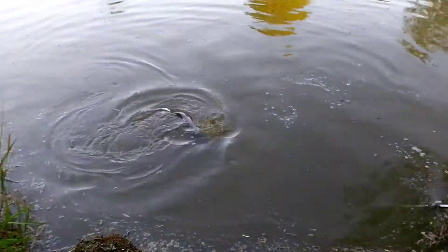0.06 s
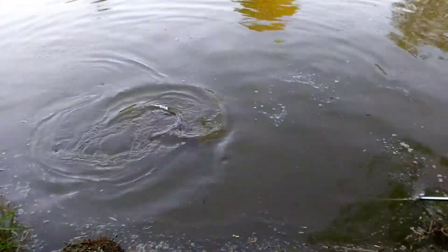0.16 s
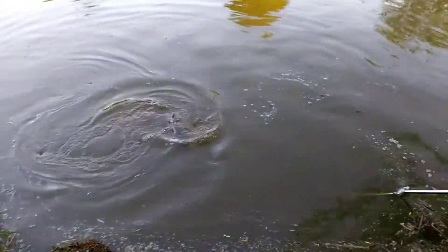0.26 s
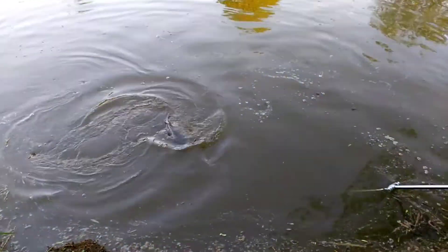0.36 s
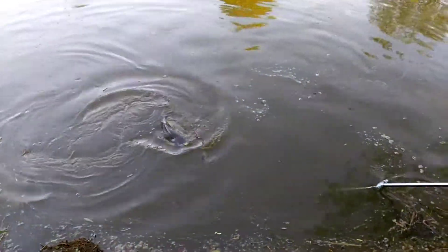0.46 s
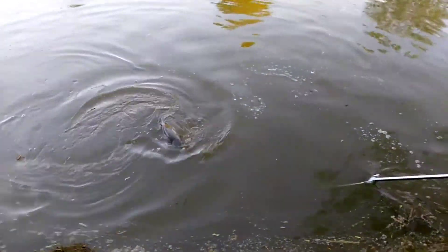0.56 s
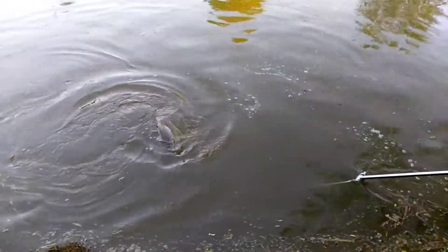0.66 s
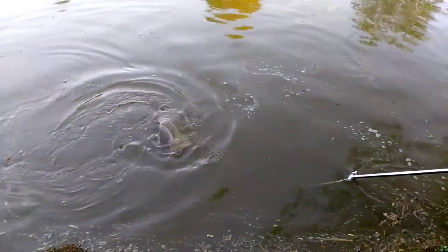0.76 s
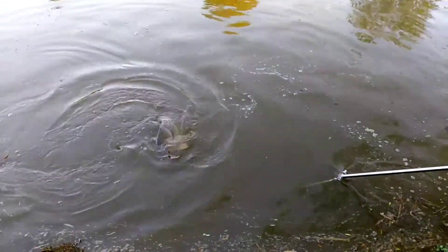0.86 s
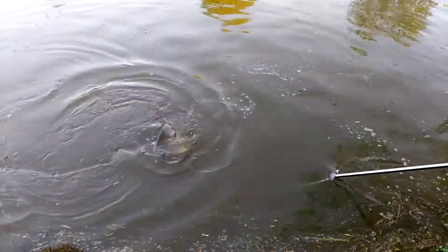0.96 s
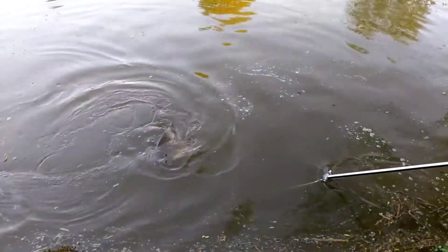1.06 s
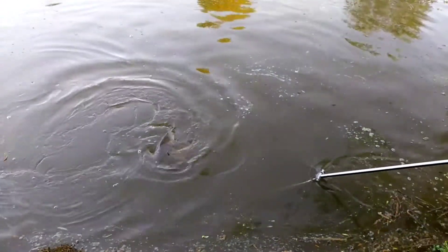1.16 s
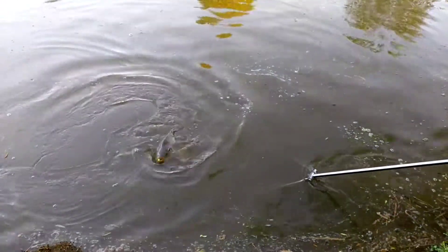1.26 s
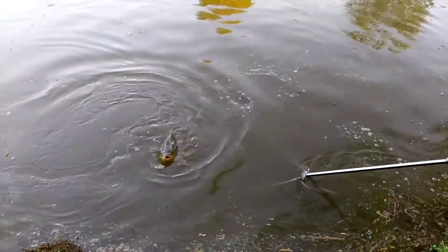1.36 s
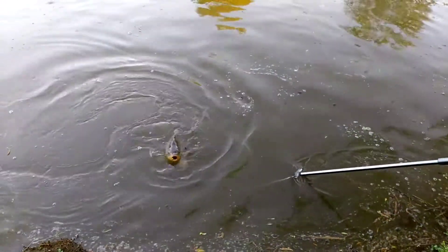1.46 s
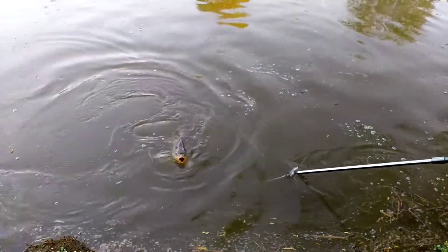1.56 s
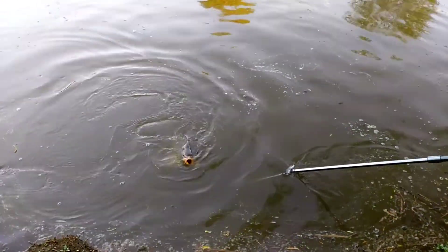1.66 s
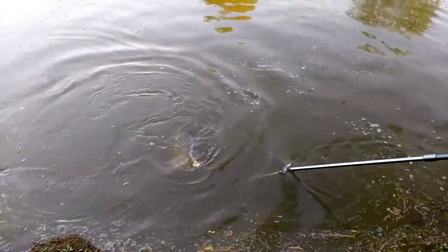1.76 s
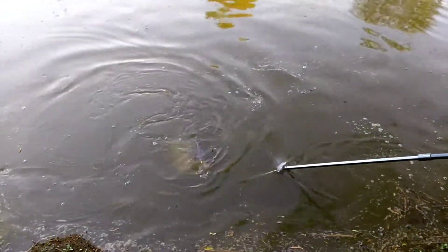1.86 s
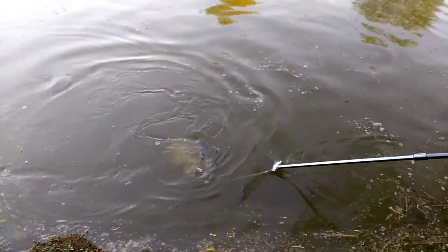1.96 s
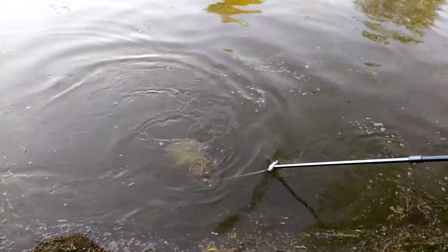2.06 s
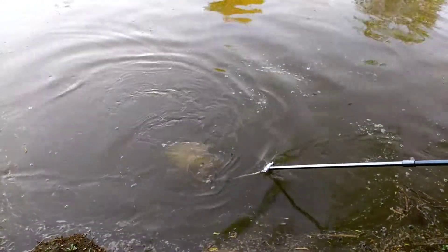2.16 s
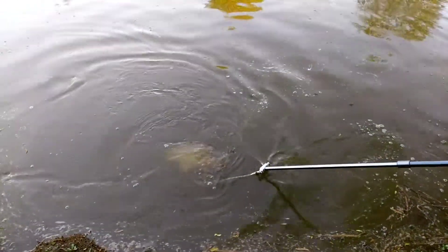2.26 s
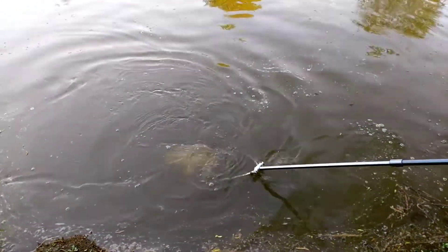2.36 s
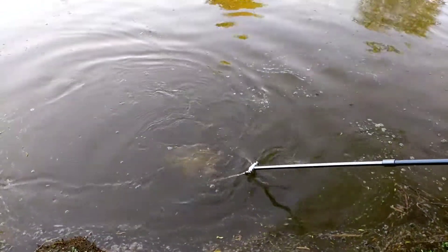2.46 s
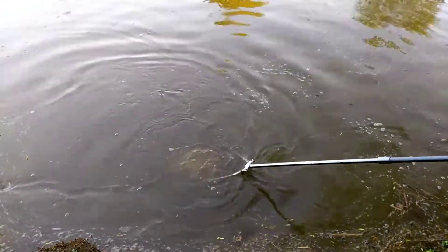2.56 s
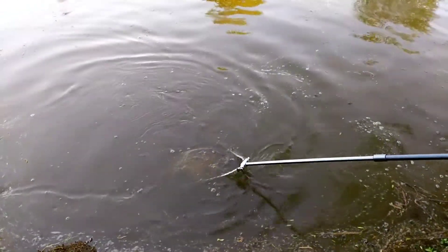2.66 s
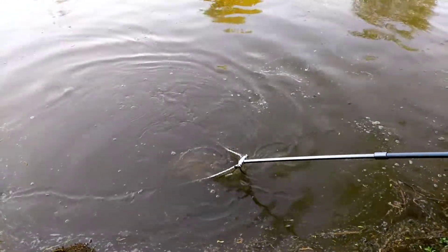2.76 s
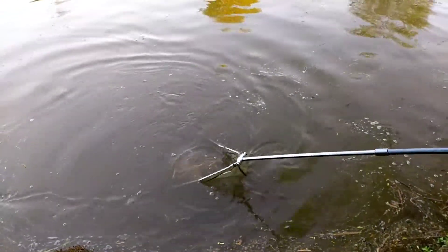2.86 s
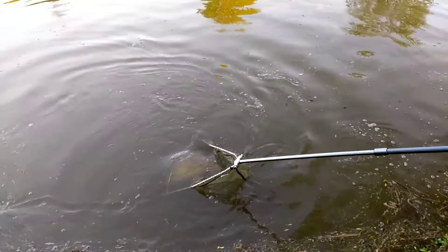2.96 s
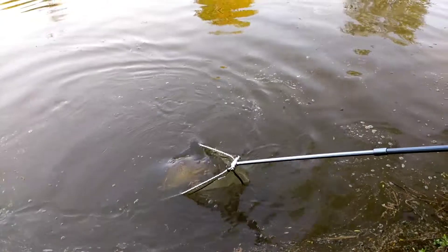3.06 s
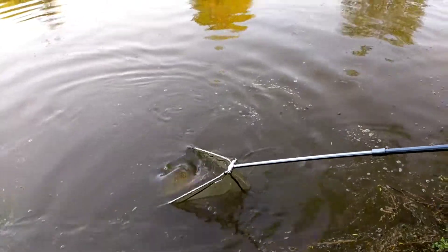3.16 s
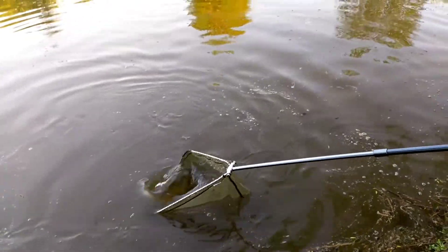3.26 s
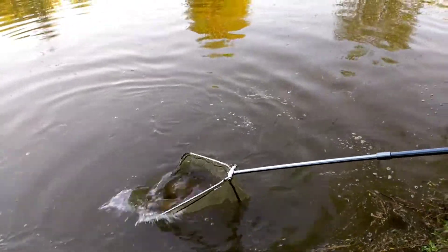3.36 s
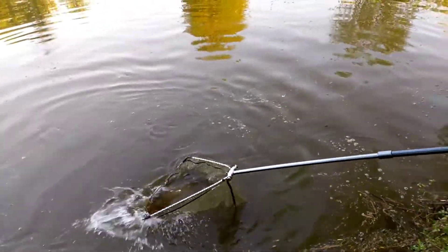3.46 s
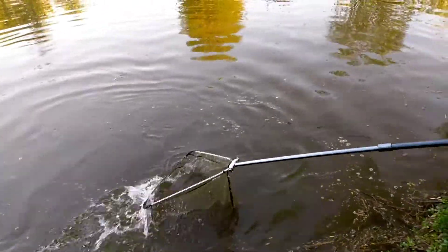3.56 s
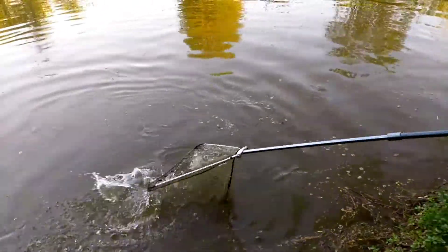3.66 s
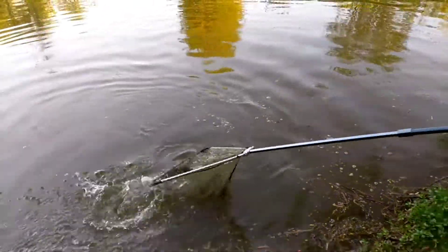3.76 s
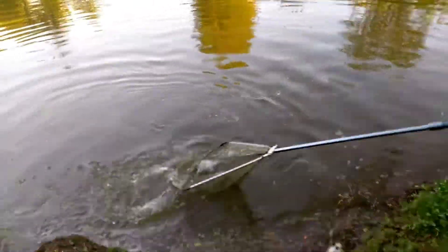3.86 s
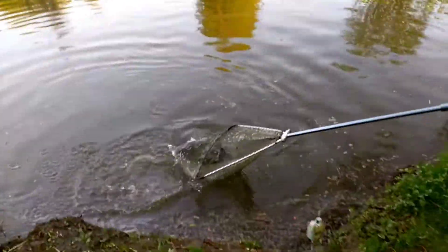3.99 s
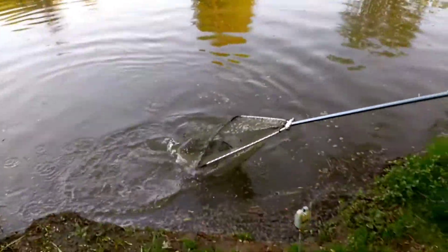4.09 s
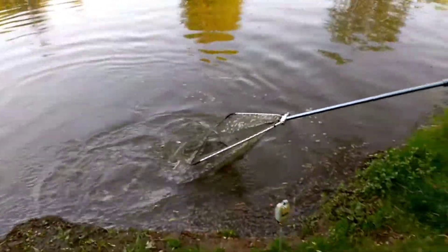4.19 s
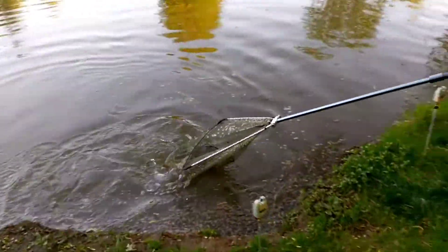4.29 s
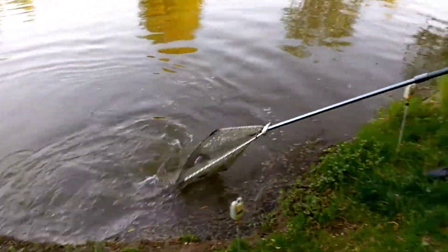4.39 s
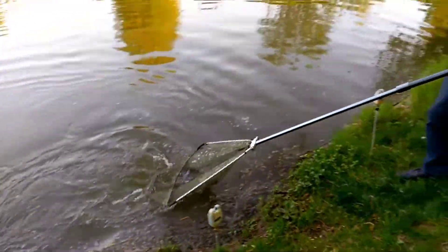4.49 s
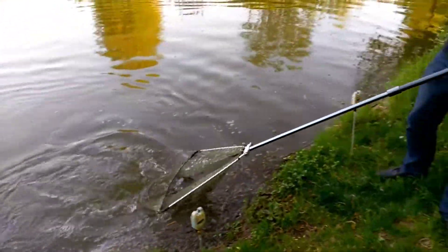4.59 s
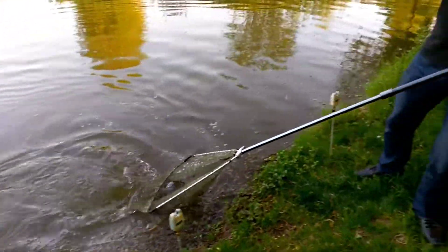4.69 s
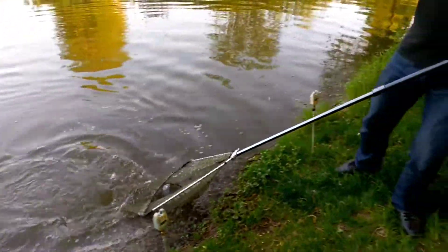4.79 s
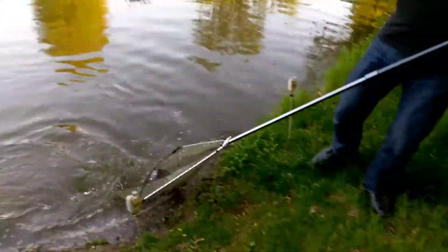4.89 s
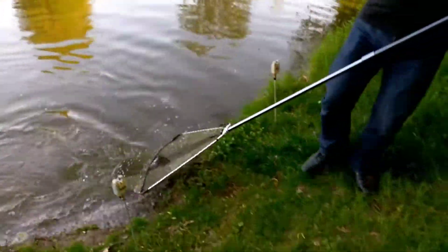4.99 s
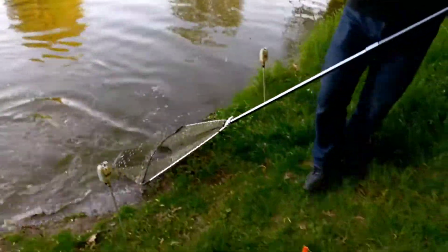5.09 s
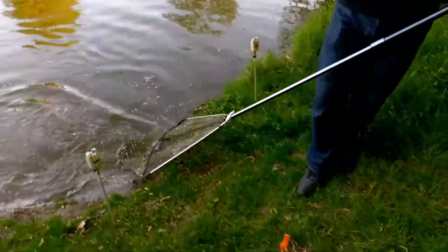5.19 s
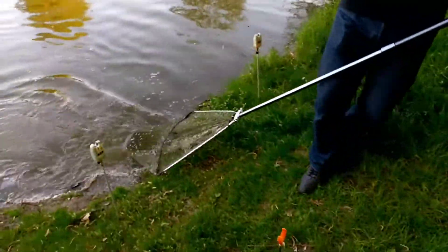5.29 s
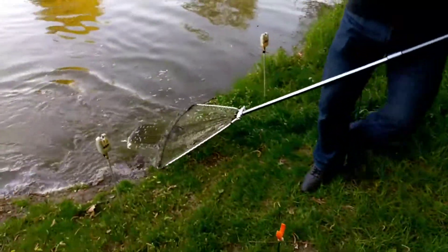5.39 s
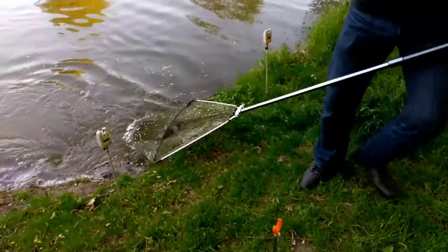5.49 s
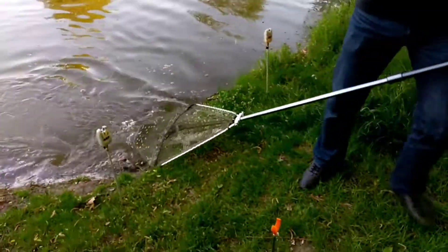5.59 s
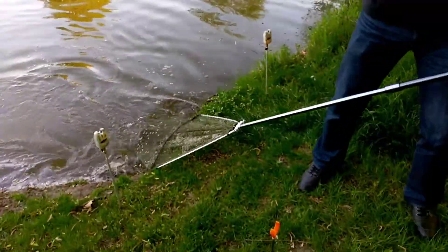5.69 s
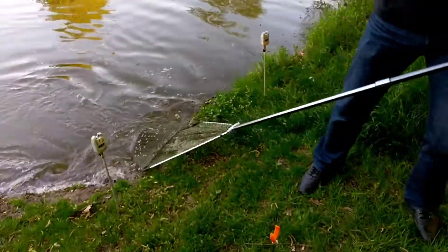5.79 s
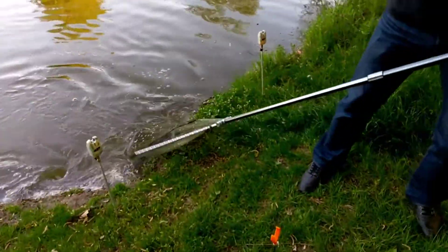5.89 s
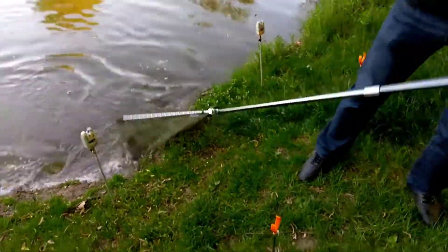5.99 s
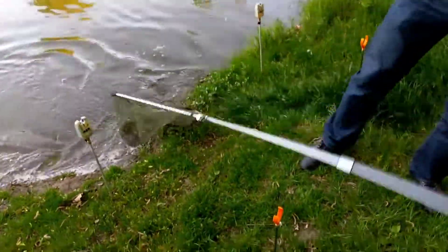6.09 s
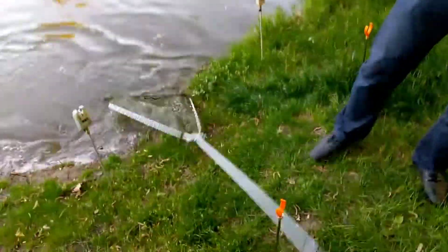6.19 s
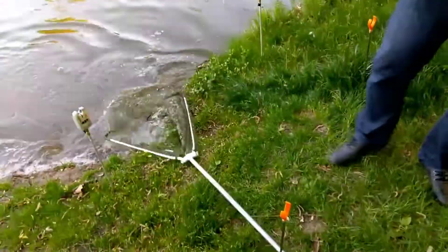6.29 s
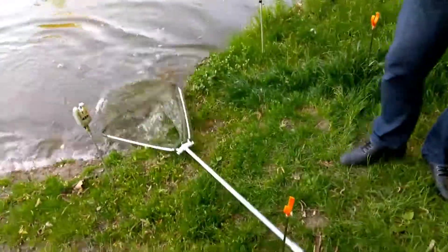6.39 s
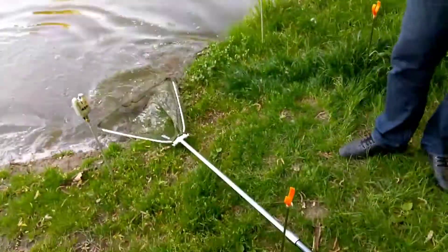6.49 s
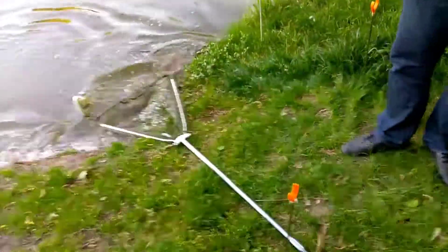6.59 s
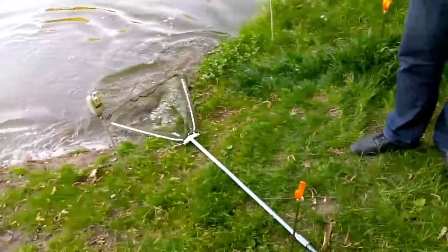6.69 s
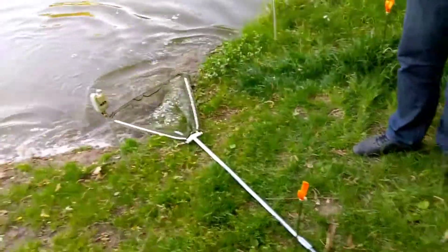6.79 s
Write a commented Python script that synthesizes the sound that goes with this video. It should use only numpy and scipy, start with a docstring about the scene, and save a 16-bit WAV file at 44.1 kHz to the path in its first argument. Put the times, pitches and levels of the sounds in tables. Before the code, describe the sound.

Faint birdsong by still water, a sudden burst of bubbly splashing, dripping mesh dragged ashore through air buffets, then a sharp metallic clatter on turf.

```python
"""At the edge of a pond a carp thrashes in a landing net and is dragged to the bank, near the microphone.
Water is noise and swarms of ringing bubbles; slaps and drips are short rings with a spray of noise.
Air buffets the moving microphone as low lumpy noise and dull bumps; mesh and grass are brushed noise.
The net's metal pole drops on the grass close by: noise blows excite the ringing modes of the tube.
Small birds, gliding and fluttering tones with echoes, twitter in the trees until the end."""
import sys
import numpy as np
from scipy import signal
from scipy.fft import rfft, irfft
from scipy.io import wavfile
from scipy.ndimage import uniform_filter1d

SR = 44100
rng = np.random.default_rng(int(sys.argv[2]) if len(sys.argv) > 2 else 0)


def log_audio(samples):
    """Write samples as a 16-bit WAV file to the path given in sys.argv[1]."""
    # one column per channel
    frames = np.atleast_2d(samples).T
    # limit to full scale, then quantise
    limited = np.clip(frames, -1, 1)
    pcm = np.round(limited * 32767).astype(np.int16)
    wavfile.write(sys.argv[1], SR, pcm)


N = 301644
TIME = np.arange(N) / SR
FREQS = np.fft.rfftfreq(N, 1 / SR)


def amp(db):
    """Decibels to gain."""
    return 10 ** (np.asarray(db) / 20)


def unit(x):
    """Scales to rms 1."""
    return x / np.sqrt(np.mean(x ** 2) + 1e-20)


def read(points, hz, axis=1):
    """A column of a table, interpolated on a log-frequency axis."""
    table = np.transpose(points)
    return np.interp(np.log(hz + 1), np.log(table[0] + 1), table[axis])


def level(rows):
    """A dB curve as gain, silent outside its span."""
    times, db = np.transpose(rows)
    inside = (TIME >= times[0]) & (TIME <= times[-1])
    return amp(np.interp(TIME, times, db)) * inside


def colour(x, spectrum):
    """Filters by a spectrum, keeping the power of white noise."""
    return irfft(rfft(x) * unit(amp(read(spectrum, FREQS))), N)


def add(mix, s, sound):
    """Adds a sound at time s."""
    part = mix[..., max(round(s * SR), 0):][..., :sound.shape[-1]]
    part += sound[..., :part.shape[-1]]


def drift(hz, count=N):
    """Slow chance of rms 1, moving up to about hz times a second."""
    lowpass = 1 / (1 + (np.fft.rfftfreq(count, 1 / SR) / hz) ** 4)
    return unit(irfft(rfft(rng.standard_normal(count)) * lowpass, count))


def burst(length, count=4096):
    """Time and envelope of a blow: a quick swell to 1 at half its length, then a slower fall."""
    t = np.arange(count) / SR
    rise = np.sqrt(2 * t / length)
    return t, rise * np.exp(.5 - t / length)


def swell(s, hold, attack, fall_db_per_s):
    """Attack, hold and release, as gain over the whole scene."""
    age = TIME - s
    return np.clip(age / attack, 0, 1) * amp(-fall_db_per_s * np.maximum(age - attack - hold, 0))


def swells(rows, attack, fall_db_per_s):
    """The joint level of overlapping swells, given as (s, hold s, dB); their powers add."""
    power = sum((amp(db) * swell(s, hold, attack, fall_db_per_s)) ** 2 for s, hold, db in rows)
    return np.sqrt(power)


def ports(x, pair):
    """Two unrelated channels become the microphone pair, whose bass is in roughly opposite phase."""
    same = np.clip(read(pair, FREQS), 0, 1)
    lead = read(pair, FREQS, axis=2)
    tilt = amp(read(pair, FREQS, axis=3) / 2)
    a, b = rfft(x)
    left = (same * a + np.sqrt(1 - same ** 2) * b) * np.exp(1j * lead) * tilt
    return irfft([left, a / tilt], N)


def echoes(x, t60, wet_db):
    """Sparse scattered returns from bank and trees, different on each side."""
    t = TIME[:SR]
    hits = rng.random((2, SR)) < .04
    taps = rng.standard_normal((2, SR)) * hits * amp(-60 * t / t60) * (t > .004)
    taps /= np.linalg.norm(taps, axis=1, keepdims=True)
    return x + amp(wet_db) * signal.oaconvolve(x, taps, axes=1)[:, :N]


def air():
    """Open air far off: a rumble and the soft hiss of trees, as coloured noise that wavers in level."""
    # colour of the open air: freq_hz, density_db (relative, per Hz)
    air_colour = [(20, -28), (38, -17), (65, 6.5), (90, 2), (144, -6.5), (342, -17), (572, -18), (834, -13),
                  (1250, -13), (1930, -19.5), (3490, -19), (5370, -27), (8270, -30.5), (15800, -35)]
    # loudness of the air: time_s, level_db
    air_level = [(0, -55), (1.1, -55.5), (2, -55.5), (3.2, -55.5), (5, -53.5), (6.84, -57)]
    # microphone pair for far sound: freq_hz, likeness (0-1), left_lead_rad, left_minus_right_db
    far_pair = [(73, 0.98, 3.76, -5), (232, 0.88, 3.59, -4.5), (586, 0.53, 3.93, -4.5), (934, 1, 5.16, -2),
                (1290, 1, 5.25, -2), (1890, 0, 7.2, -0.5), (3020, 0.45, 9.8, -4), (4600, 0.13, 9, -3.5),
                (6460, 0, 5.8, -3.5), (9000, 0.03, 6.5, -3.5), (16000, .05, 13.4, -4.5)]
    hiss = colour(rng.standard_normal((2, N)), air_colour) * amp(0.78 * drift(6.9))
    return ports(hiss * amp(np.interp(TIME, *np.transpose(air_level))), far_pair)


def note(length, start_hz, middle_hz, end_hz, buzz):
    """A gliding whistle; in buzzy notes a fast flutter splits it into a comb."""
    note_spread = .008  # chance pitch offset of each note, as a share
    flutter_hz, shimmer_db = 560, 1.6
    waver = .015  # pitch share at a hoarseness of 1
    u = np.linspace(0, 1, int(length * SR))
    arch = np.polyval(np.polyfit([0, .5, 1], [start_hz, middle_hz, end_hz], 2), u)
    hoarse = (0.42 + min(buzz, .6)) * max(middle_hz / 5000, 1) ** 3  # the highest notes break up
    wobble = waver * hoarse * drift(236, count=16384)[:len(u)]
    hz = arch * (1 + note_spread * rng.standard_normal() + wobble)
    flutter = buzz * np.sin(2 * np.pi * np.cumsum(flutter_hz * arch / middle_hz) / SR)
    shimmer = unit(amp(shimmer_db * drift(90, count=16384)[:len(u)]))
    tone = np.sin(2 * np.pi * np.cumsum(hz) / SR + flutter)
    return shimmer * tone * signal.windows.tukey(len(u), .4)


def trill(s, length, hz, swing_hz, per_s, db):
    """A whistle that swings quickly up and down, loudest at the foot of each swing."""
    t = np.arange(int(length * SR)) / SR
    swing = np.cos(2 * np.pi * per_s * t)
    whistle = np.sin(2 * np.pi * np.cumsum(hz + swing_hz * swing) / SR)
    return s, amp(db) * whistle * (1 - 0.76 * swing) * signal.windows.tukey(len(t), .3)


def birds():
    """Phrases of evenly repeated syllables, plain whistles and one trill, echoing among the trees."""
    # the syllables by name: length_s, start_hz, middle_hz, end_hz, buzz_rad
    syllables = {"arch": (0.0336, 4550, 5850, 5150, 0.23), "under": (0.034, 4600, 4250, 3860, .7),
                 "chip": (.042, 4500, 5480, 3300, .8), "slur": (.052, 4300, 2700, 2270, 0.6),
                 "lift": (.078, 2200, 3080, 3600, .6), "rasp": (0.0273, 2900, 3200, 3400, 1.1),
                 "zip": (.047, 4300, 4640, 4740, 1.1), "sweep": (0.047, 4150, 5070, 5800, 1.14),
                 "dip": (.032, 3500, 3020, 2640, 1.0), "fall": (.042, 3250, 3000, 2500, .3),
                 "thin": (.105, 7350, 6680, 6420, .35), "sizzle": (.19, 7600, 6900, 6690, .8),
                 "purr": (0.113, 3600, 3700, 3700, 0.35), "flick": (0.019, 6100, 4800, 4200, 0.46)}
    # pace of each repeated syllable by name: period_s
    repeat_s = {"arch": .151, "under": .151, "chip": .188, "slur": .08, "rasp": .055, "zip": .103, "sweep":
                .133, "dip": .106, "thin": .098, "purr": .11, "flick": .32}
    # phrases: start_s, syllable, count, level_db (relative)
    phrases = [(0, "arch", 4, -61.5), (0, "under", 4, -57), (0.089, "slur", 1, -56.5),
               (.235, "rasp", 1, -56), (0.545, "dip", 1, -57), (.622, "slur", 1, -56.5),
               (0.673, "lift", 1, -57), (.747, "arch", 1, -62), (.783, "slur", 2, -59),
               (1.303, "chip", 2, -54), (1.356, "thin", 1, -62), (1.419, "rasp", 1, -59),
               (1.495, "thin", 1, -58.5), (1.657, "zip", 1, -55), (1.705, "rasp", 4, -59),
               (1.72, "sizzle", 1, -59.5), (1.992, "zip", 1, -51.5), (2.089, "zip", 2, -54.5),
               (2.308, "zip", 1, -51), (2.356, "thin", 2, -60.5), (2.404, "sweep", 4, -53.5),
               (2.606, "purr", 2, -53.5), (2.853, "dip", 5, -59), (2.957, "thin", 2, -61),
               (4.122, "fall", 1, -52), (4.18, "fall", 1, -52.5), (4.298, "fall", 1, -53),
               (6.412, "flick", 2, -58.5)]
    # plain whistles of other birds: start_s, length_s, start_hz, end_hz, level_db (relative)
    whistles = [(0.16, .07, 3220, 2850, -60), (0.213, .15, 1900, 2000, -66),
                (0.357, 0.088, 3460, 4410, -61), (0.404, 0.097, 3100, 2600, -62),
                (0.499, 0.11, 2290, 2400, -64.5), (1.163, 0.015, 2200, 2550, -57.5),
                (1.516, 0.21, 1798, 1760, -62.5), (1.933, 0.083, 2890, 4100, -59.5),
                (1.973, 0.26, 4500, 4620, -61), (1.997, .1, 2350, 2410, -59),
                (2.057, .11, 3100, 2520, -62.5), (2.369, 0.14, 2400, 2090, -64.5),
                (2.379, .1, 1340, 1600, -65), (2.747, .24, 2180, 2605, -58.5), (2.92, .1, 1453, 1525, -63),
                (3.095, 0.16, 2060, 2025, -67), (3.217, 0.058, 3690, 3973, -54),
                (3.299, 0.062, 3860, 3764, -51.5), (4.707, 0.091, 2226, 2420, -59),
                (6.747, 0.061, 4070, 4130, -62)]
    # the trill: start_s, length_s, pitch_hz, swing_hz, swings_per_s
    trill_row = (1.34, .16, 2420, 190, 43)
    bend, whistle_buzz = .72, .12  # share of the glide made by half time; radians
    out = np.zeros(N)
    for s, syllable, count, db in phrases:
        for k in range(round(count)):
            sung = note(*syllables[syllable])
            add(out, s + k * repeat_s.get(syllable, 0), amp(db) * sung)
    for s, length, start_hz, end_hz, db in whistles:
        middle_hz = start_hz + bend * (end_hz - start_hz)
        add(out, s, amp(db) * note(length, start_hz, middle_hz, end_hz, whistle_buzz))
    add(out, *trill(*trill_row, db=-61.5))
    sides = np.array([out * amp(-4.5), out * amp(3)])  # stronger on the right
    return echoes(sides, t60=0.49, wet_db=-2)


def rustle():
    """A dull, soft rub near the microphone: low noise that follows a level curve."""
    # loudness of the rub: time_s, level_db (relative)
    rub_level = [(0.55, -90), (0.59, -48), (0.63, -78), (0.8, -60), (0.95, -54), (1.15, -58), (1.6, -69.5)]
    # colour of the rub: freq_hz, density_db (relative, per Hz)
    rub_colour = [(60, -18), (150, 0), (360, -0.5), (600, -14), (1500, -45)]
    return colour(rng.standard_normal((2, N)), rub_colour) * level(rub_level)


def push(hz, half_length):
    """A dull swing of air pressure, centred four half lengths after its start."""
    t = np.arange(-4 * half_length, 4 * half_length, 1 / SR)
    return np.exp(-.5 * (t / half_length) ** 2) * np.cos(2 * np.pi * hz * t)


def buffeting():
    """Gusts on the microphone are lumpy low eddies with single dull bumps, mostly on the right port."""
    # gusts: start_s, hold_s, level_db (relative)
    gusts = [(3.39, 0.0092, -54.5), (3.81, .005, -50), (3.915, 0.038, -44), (4.09, .01, -50.5),
             (4.235, 0.016, -47.5), (4.32, 0.057, -41.5), (4.455, 0.015, -51.5), (5.165, 0.13, -48),
             (5.38, 0.22, -52), (5.59, 0.23, -40), (5.89, 0.14, -39), (6.07, .04, -47), (6.38, 0.38, -61.5)]
    # colour of the gusts: freq_hz, density_db (relative, per Hz)
    gust_colour = [(20, -28), (45, -8), (70, 7.5), (110, 6), (170, -2.5), (250, -12.5), (350, -22),
                   (600, -34), (1200, -69)]
    # single dull bumps: centre_s, peak_db (right port), pitch_hz
    bumps = [(0.591, -43.5, 121), (3.974, -28, 104), (4.358, -26, 90), (4.397, -33, 90), (5.183, -35, 150),
             (5.235, -23, 148), (5.2483, -17, 216), (5.3, -31, 125), (5.507, -30, 156), (5.551, -29.5, 158),
             (5.622, -20.5, 133), (5.657, -22.5, 113), (5.743, -24, 113), (5.829, -23, 113),
             (5.926, -23.5, 202), (6.053, -17.5, 195), (6.522, -38, 114)]
    # half length of a bump at a middling pitch; it shrinks with the square of the pitch
    bump_s, bump_hz = 0.0046, 112.6
    lumps = unit(amp(3.5 * np.tanh(drift(30))))
    strength = swells(gusts, attack=0.02, fall_db_per_s=233) * amp(6.5)
    eddies = colour(rng.standard_normal((2, N)), gust_colour) * lumps * strength
    for s, db, hz in bumps:
        swing = amp(db) * push(hz, bump_s * (bump_hz / hz) ** 2)
        add(eddies[0], s - len(swing) / SR / 2, swing)
    left = amp(-15) * eddies[1] - amp(-23.5) * eddies[0]
    return np.array([left, eddies[0]])


def drips():
    """Random drops off the mesh, weaker as it drains; rows like those of the slaps."""
    first_s, last_s, per_s = 3.95, 5.8, 16
    low_hz, high_hz = 746, 5600
    start_db, fade_db_per_s, spread_db = -42.5, 3, 1  # relative, as for the slaps
    times = np.arange(first_s, last_s, 1 / per_s)
    late, size, pitch, share = rng.random((len(times), 4)).T
    db = start_db - fade_db_per_s * (times - first_s) + spread_db * (2 * size - 1)
    hz = low_hz * (high_hz / low_hz) ** pitch
    return list(zip(times + late / per_s, db, hz, 0.79 * share))


def slaps():
    """Each slap or drop rings a small cavity, as narrow-band noise, and throws a wide spatter."""
    # single slaps, plops and small ticks, loud and faint:
    # start_s, level_db (relative), pitch_hz, spatter_share (0-1)
    slap_rows = [(0.6108, -34, 3700, .9), (2.765, -32, 3200, .7), (3.364, -29, 1500, .3),
                 (3.4935, -21, 3800, .6), (6.1445, -28, 1340, .85), (1.349, -45, 6000, .9),
                 (3.329, -40, 5800, .4), (3.416, -29, 3700, .4), (3.473, -30, 1200, .2),
                 (3.495, -27, 1300, .3), (3.509, -29, 5200, .3), (3.548, -30, 1400, .2),
                 (3.569, -28, 3500, .2), (3.606, -33, 3600, .3), (3.688, -30, 800, .3),
                 (3.725, -33, 3000, .6), (3.838, -32, 3700, .4), (3.878, -30, 3600, .6),
                 (3.924, -31, 3400, .7), (4.053, -39, 870, .3), (4.161, -35, 800, .2),
                 (4.371, -35, 700, .45), (4.6025, -35, 3600, .5), (5.118, -37, 810, .25),
                 (5.209, -39, 4500, .7), (5.220, -40, 1300, .1), (5.328, -43, 850, .1),
                 (5.340, -40, 1200, .2), (5.380, -41, 1150, .45)]
    # colour of the spatter: freq_hz, density_db (relative, per Hz)
    spatter_colour = [(300, 7), (1300, 3), (2200, 3.5), (3800, -8), (6000, -2.5), (12000, -5.5),
                      (16000, -12)]
    smack_s, plop_s = 0.0002, 0.0048  # a flat smack is short, a round plop rings longer
    cavity, spatter = np.zeros((2, 2, N))
    for s, db, hz, share in slap_rows + drips():
        share = np.clip(share, 0, 1)
        t, shape = burst(plop_s + share * (smack_s - plop_s))
        band = 1 / (1 + ((np.fft.rfftfreq(len(t), 1 / SR) / hz - 1) / 0.11) ** 2)
        ring = irfft(rfft(rng.standard_normal((2, len(t)))) * band) * shape
        ring *= np.linalg.norm(shape) / np.linalg.norm(ring, axis=1, keepdims=True)
        add(cavity, s, amp(db) * np.sqrt(1 - share ** 2) * ring)
        add(spatter, s, amp(db) * share * shape * rng.standard_normal((2, len(t))))
    return amp(-7) * (cavity + colour(spatter, spatter_colour))


def bubbles(per_s, spread_db, cycles, low_hz, high_hz, count=28):
    """Bubbles of many sizes; each rings a few cycles and rises in pitch as it nears the surface."""
    out = np.zeros((2, N))
    density = per_s * np.ones(N)
    for hz in np.geomspace(low_hz, high_hz, count):
        age = np.arange(int(5 * cycles * SR / hz)) / SR * hz / cycles
        ring = hz * np.exp(-age) * np.sin(2 * np.pi * cycles * age * (1 + 0.032 * age))
        born = np.flatnonzero(rng.random(N) < density / count / SR)
        size_db = spread_db * np.minimum(rng.exponential(1, len(born)), 3.5)
        size = amp(size_db) / np.sqrt(density[born])  # denser swarms are no louder in themselves
        clicks = np.zeros((2, N))
        clicks[:, born] = size * rng.choice([-1, 1], (2, len(born)))
        out += signal.oaconvolve(clicks, ring[None], axes=1)[:, :N]
    return unit(out)


def patchy(x, depth_db, size=256):
    """Sheets and clots of water: neighbouring pitches swell and fade together for some milliseconds."""
    z = signal.stft(x, nperseg=size)[2]
    field = rng.standard_normal(z.shape[1:])
    field = uniform_filter1d(field, size=5, axis=0)  # over pitch
    field = uniform_filter1d(field, size=4, axis=1)  # over time
    return unit(signal.istft(z * amp(depth_db * unit(field)), nperseg=size)[1][:, :N])


def stirred(beats):
    """How hard the water moves: beats that swell, hold and collapse, and a wash that settles slowly."""
    attack_s = .028
    wash = amp(-12) * swells(beats, attack_s, fall_db_per_s=12.5)
    return np.hypot(swells(beats, attack_s, fall_db_per_s=110), wash)


def water():
    """The harder the fish churns, the denser the bubbles; spray fizzes above and air pockets gulp below."""
    # the fish beats the water, later wallows in the shallows:
    # start_s, hold_s, churn_db (relative), spray_db (relative)
    thrashes = [(3.27, .04, -62, -74), (3.32, .04, -54, -64), (3.384, .075, -45, -59),
                (3.535, .03, -44, -58), (3.609, .04, -48, -64.5), (3.695, .03, -48.5, -57),
                (3.825, .05, -47.5, -54.5), (3.94, 0.027, -54, -68), (5.2, .15, -64, -81),
                (5.47, .3, -61, -70.5), (5.85, .25, -63, -78)]
    # large air pockets under the fish: time_s, level_db (relative)
    pocket_level = [(3.35, -85), (3.47, -53), (3.62, -54), (3.85, -56), (4.0, -70), (4.5, -67)]
    # colours of churn, spray and pockets: freq_hz, density_db (relative, per Hz)
    churn_colour = [(400, -16.5), (750, -3.5), (1300, 0.5), (1650, -0.5), (2200, -9), (3000, 1.5),
                    (3800, -4.5), (4600, -10.5), (5700, -6), (7500, -30), (15000, -47)]
    spray_colour = [(3500, 5.5), (6000, -3.5), (7500, 1), (9500, -3.5), (11700, -3.5), (13500, -6),
                    (16000, -14)]
    pocket_colour = [(130, -37), (280, -3), (420, -2), (560, 3.5), (720, 1.5), (1000, -26)]
    churn = stirred([(s, hold, db) for s, hold, db, _ in thrashes])
    thrown = stirred([(s, hold, db) for s, hold, _, db in thrashes])
    per_s = 500 + 5000 * churn / churn.max()
    wash = .6 * rng.standard_normal((2, N))
    body = bubbles(per_s, spread_db=3.0, cycles=6.9, low_hz=590, high_hz=8070)
    body = patchy(body + wash, depth_db=3.2)
    spray = bubbles(per_s, spread_db=2.0, cycles=4.3, low_hz=4030, high_hz=14800)
    spray = patchy(spray + wash, depth_db=2.5)
    gulps = bubbles(350, spread_db=4.0, cycles=4.5, low_hz=258, high_hz=883, count=12)
    clumps = unit(amp(1.6 * drift(105) + 1.3 * drift(28)))  # water lands in clots
    splash = amp(2.5) * unit(colour(body, churn_colour)) * churn
    splash += amp(7.5) * unit(colour(spray, spray_colour)) * thrown
    return splash * clumps + amp(5.5) * unit(colour(gulps, pocket_colour)) * level(pocket_level)


def drag():
    """Wet mesh hisses up the bank; its ground echo combs the hiss, and the comb sinks as the path grows."""
    # loudness of the sliding mesh: time_s, level_db (relative)
    drag_level = [(5.6, -65), (5.8, -58.5), (5.92, -52), (6.02, -53.5), (6.14, -55), (6.22, -59.5)]
    # colour of the sliding mesh: freq_hz, density_db (relative, per Hz)
    drag_colour = [(300, -8), (520, 4.5), (800, -4), (1450, 1.5), (1900, -6), (2400, -5), (3000, -6),
                   (3700, -20), (5500, -13), (12000, -27)]
    roughness = unit(amp(0.71 * drift(90)))
    hiss = colour(rng.standard_normal((2, N)), drag_colour) * roughness * level(drag_level)
    delay_s = np.interp(TIME, [5.7, 6.2], [.00198, .00212])
    echo = np.array([np.interp(TIME - delay_s, TIME, side) for side in hiss])
    return hiss + .6 * echo


def grass():
    """Mesh and shoes brush the grass: blades flick past in small clumps of noise."""
    # strokes through the grass: start_s, hold_s, level_db (relative)
    stroke_rows = [(6.05, .12, -56.5), (6.2, 0.051, -61.5), (6.28, 0.006, -33.5), (6.355, 0.0069, -48),
                   (6.4, 0.19, -64.5), (6.645, 0.01, -54), (6.81, .03, -57.5)]
    # colour of the grass: freq_hz, density_db (relative, per Hz)
    grass_colour = [(400, 4.5), (1300, -2.5), (2300, -3.5), (4100, 2), (5500, -5.5), (7500, -4), (9500, -7),
                    (11500, -5), (16000, -19)]
    strokes = swells(stroke_rows, attack=0.01, fall_db_per_s=377)
    clumps = unit(amp(3.2 * drift(160)))
    return colour(rng.standard_normal((2, N)), grass_colour) * clumps * strokes


def pole():
    """The pole thuds on the turf, its joints clack and the tube rings briefly in its modes."""
    # the pole lands and rattles: start_s, level_db (relative), length_s (of the blow's fall)
    knocks = [(6.2905, -36, .005), (6.2958, -20, .0007), (6.2985, -23, .002), (6.3008, -8, .0011),
              (6.3075, -21, .0016), (6.3185, -34, .002), (6.3325, -30, .0009)]
    # colour of the clacks: freq_hz, density_db (relative, per Hz)
    clack_colour = [(60, -32), (300, 5), (800, -11), (1300, -4), (2600, -2.5), (4000, 8.5), (5200, -5.5),
                    (7200, -7), (9200, -11), (11000, -7), (16000, -24)]
    # modes of the tube: pitch_hz, level_db (relative), t60_s
    tube_modes = [(1724, 0, .05), (1970, -5, .09), (2505, 1, .07), (3160, 1, .066), (3920, -8, .07),
                  (4100, 4, .06), (4700, -9, 0.044), (5300, -3, .045), (6985, -8, 0.045), (7960, -6, 0.042),
                  (10700, -20, .04)]
    blows = np.zeros((2, N))
    for s, db, length in knocks:
        t, shape = burst(length)
        add(blows, s, amp(db) * shape * rng.standard_normal((2, len(t))))
    t = TIME[:SR // 4]
    tube = sum(amp(db - 60 * t / t60) * np.sin(2 * np.pi * hz * t) for hz, db, t60 in tube_modes)
    ringing = signal.oaconvolve(blows, tube[None] / np.linalg.norm(tube), axes=1)[:, :N]
    out = amp(-8.5) * colour(blows, clack_colour) + amp(-13) * ringing
    thud = amp(-6) * push(hz=238, half_length=.0018)
    add(out[0], 6.2973 - len(thud) / SR / 2, thud)
    return out


def scene():
    """Near water and grass, far air and birds, the pole beneath the microphone and air striking it."""
    # microphone pair for near sound: freq_hz, likeness (0-1), left_lead_rad, left_minus_right_db
    near_pair = [(80, .97, 3.4, -5), (300, .99, 3.4, -3.5), (600, .97, 3.5, -2), (950, .85, 4.2, -2),
                 (1350, .86, 4.1, -.5), (1700, .6, 4.6, -1.5), (2900, .55, 3.6, -2.5), (4000, .4, 6, -4),
                 (5000, .4, 5.8, -4), (8000, .2, 8, 0), (16000, .15, 9, 0)]
    # the same pair for the pole, right beneath it: freq_hz, likeness, left_lead_rad, left_minus_right_db
    beneath_pair = [(260, 0.97, 3.42, -3.5), (1000, 0.74, 4, -3.5), (2150, 0.55, 3.7, -3),
                    (4000, 0.3, 2.77, -6.5), (8000, .2, 2.3, 2), (16000, .15, 1.8, -1)]
    near = echoes(water() + slaps() + grass(), t60=0.16, wet_db=-9.5)
    near = ports(near + drag() + rustle(), near_pair)
    return near + ports(pole(), beneath_pair) + air() + birds() + buffeting()


def record(dry):
    """The recorder's band limit: a steep low-pass at 15.9 kHz."""
    lowpass = signal.firwin(511, 15900, window=("kaiser", 9), fs=SR)
    return signal.oaconvolve(dry, lowpass[None], "same")


dry = scene()
out = record(dry)
log_audio(out)
```